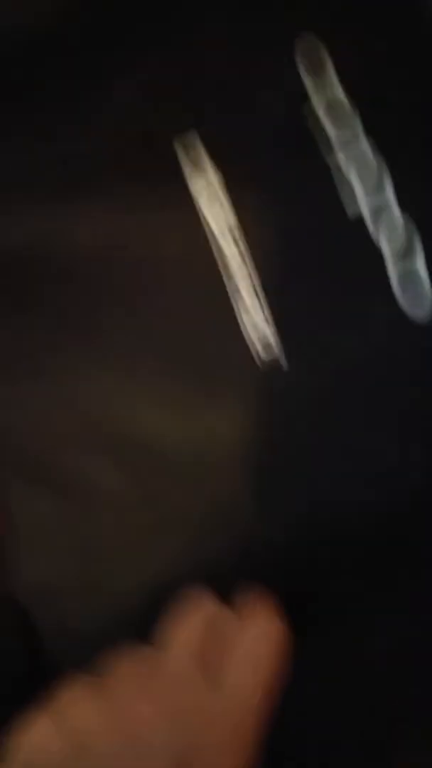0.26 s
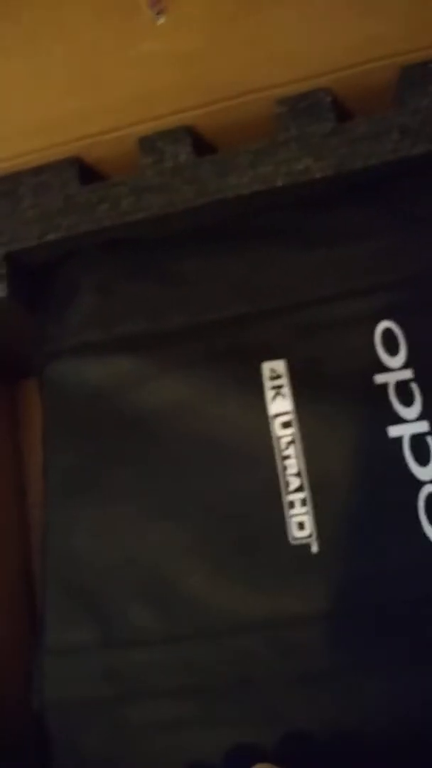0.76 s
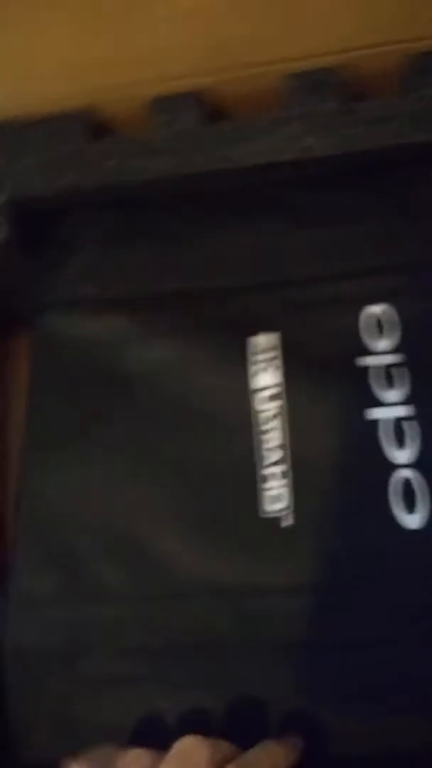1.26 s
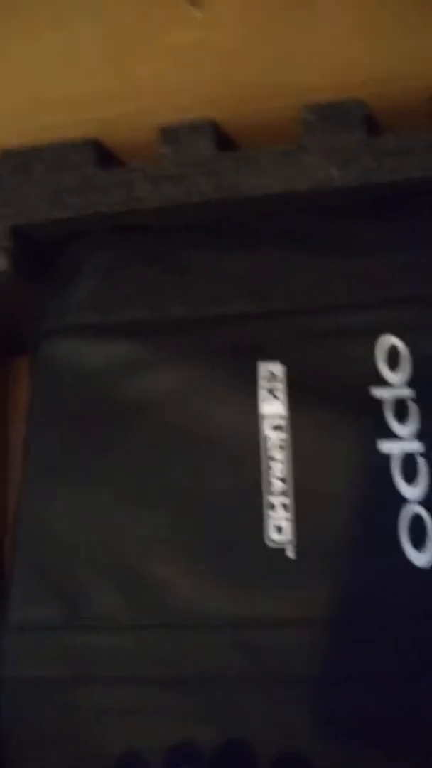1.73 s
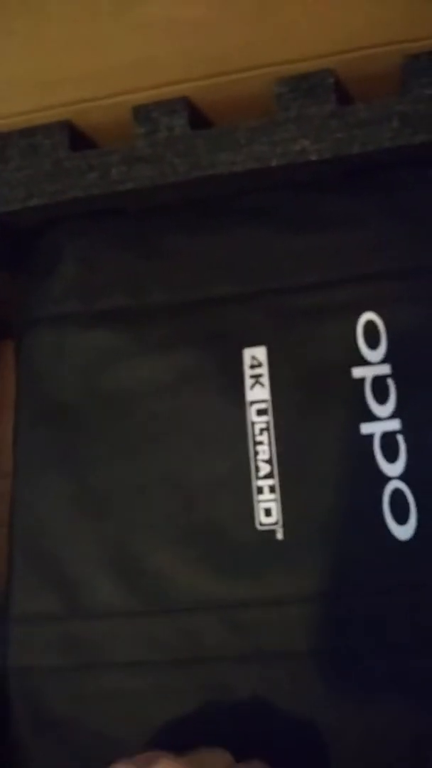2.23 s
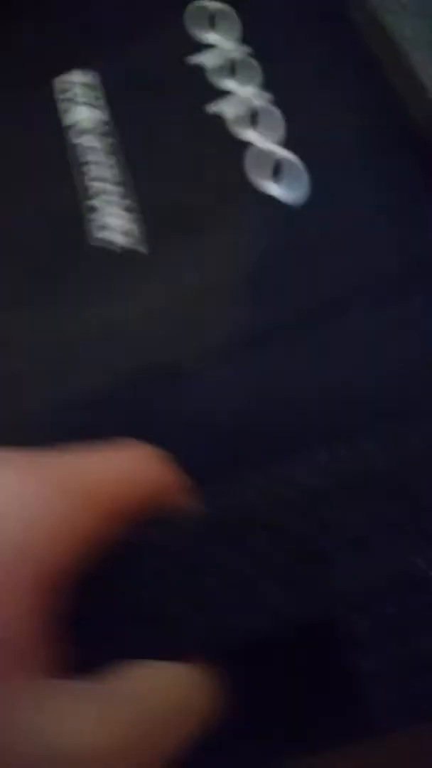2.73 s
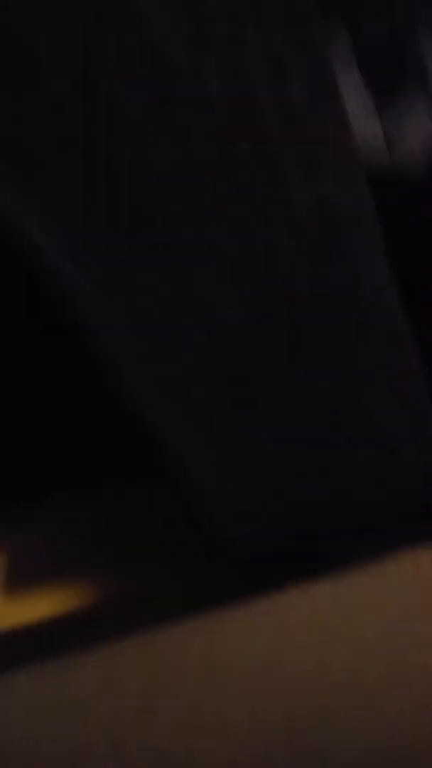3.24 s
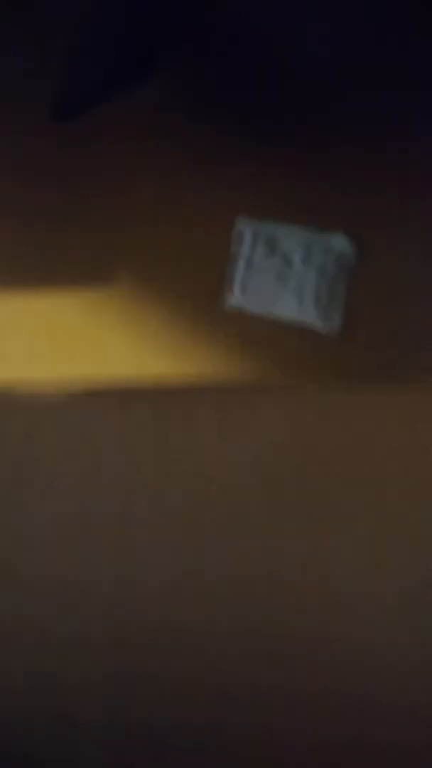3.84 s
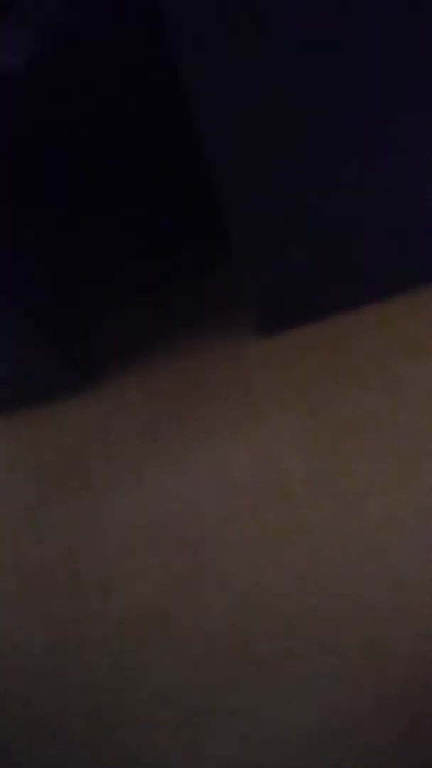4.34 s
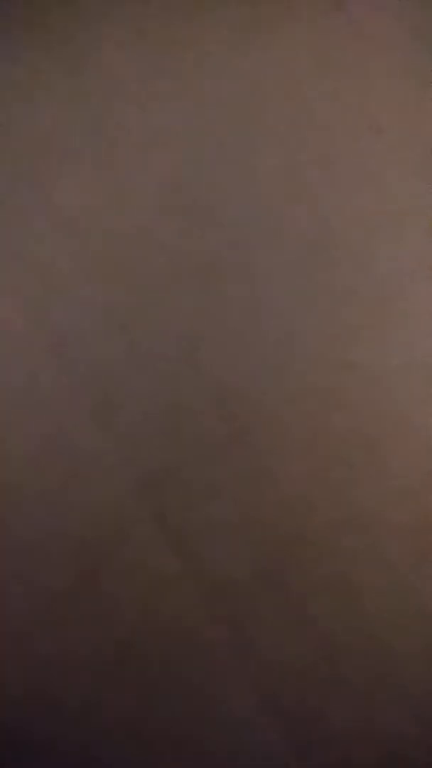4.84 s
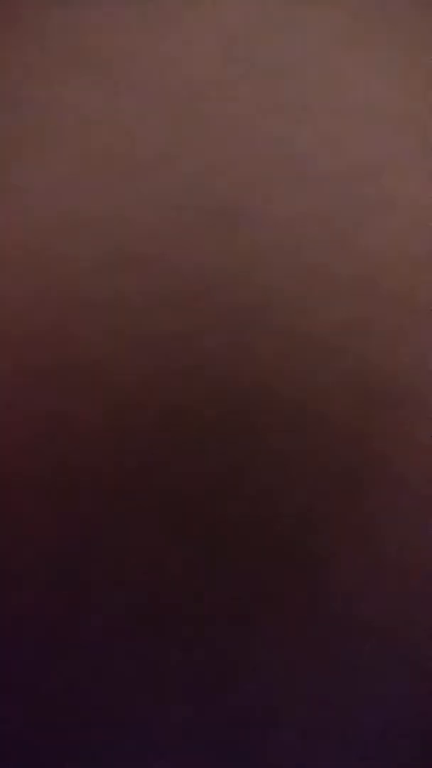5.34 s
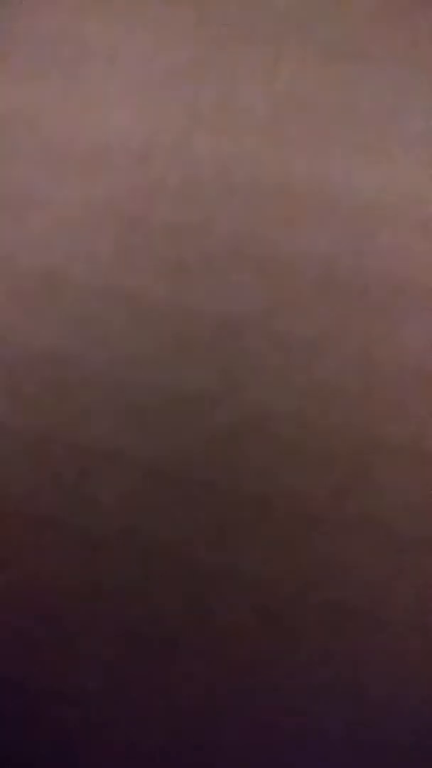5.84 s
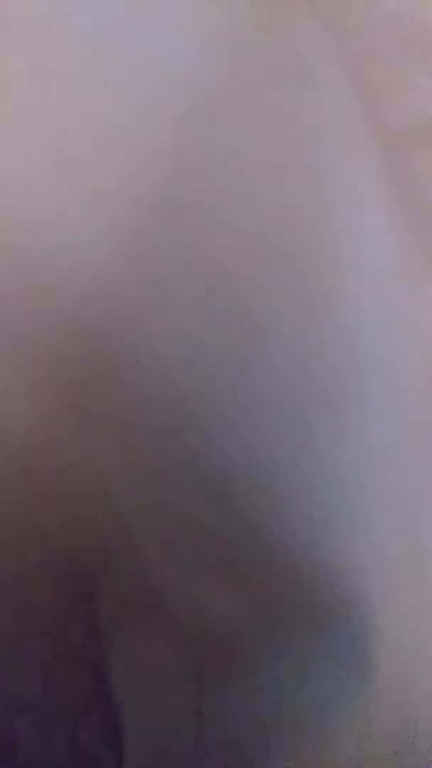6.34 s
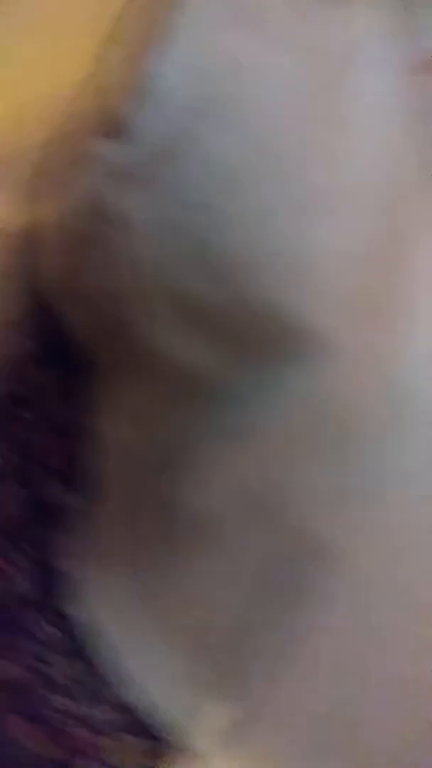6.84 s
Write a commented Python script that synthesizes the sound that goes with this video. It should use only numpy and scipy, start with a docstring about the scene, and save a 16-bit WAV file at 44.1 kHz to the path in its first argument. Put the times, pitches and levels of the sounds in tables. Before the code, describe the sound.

Foam packing rubs lightly against a cardboard box, with a small knock and a few brief scrapes. After a lull, a sharp snap and hollow thumps lead into longer, hissing drags that make the box walls rumble. More thumps follow, and the scraping is loudest near the end before it dies away. The microphone is close, in a quiet room with little echo.

```python
"""Hissing, rubbing and hollow knocks: foam packing is dragged out of a cardboard box.
Tiny foam cells catch on the cardboard and let go, which hisses and makes the walls rumble.
Pieces knock the box, which booms like a slack drum, and foam edges snap free.
A hand-held mono microphone is close by, in a soft room."""
import sys
import numpy as np
from scipy import signal
from scipy.fft import rfft, irfft, next_fast_len
from scipy.io import wavfile
from scipy.ndimage import uniform_filter1d, map_coordinates

SR = 44100
rng = np.random.default_rng(int(sys.argv[2]) if len(sys.argv) > 2 else 0)


def generate_wav(sig):
    """Save sig (samples, or channels by samples) to the path in sys.argv[1] as 16-bit PCM at SR."""
    pcm = np.round(np.clip(np.atleast_2d(sig).T, -1, 1) * 32767).astype(np.int16)
    wavfile.write(sys.argv[1], SR, pcm)


N = 312669

# The notes the box walls ring at. Each row: pitch in Hz, seconds to fade by 60 dB.
WALL_NOTES = [(130, 0.15), (180, 0.14), (215, 0.05), (260, 0.12), (355, 0.049), (410, 0.08), (525, 0.14),
              (700, 0.11), (1010, 0.045), (1440, 0.043), (2130, 0.11)]
EDGE_DB = 20  # a swell gains this much over its rise time and loses it over its fall time
TOP_HZ = 15950


def drag():
    """Foam scrapes on cardboard: one uneven pull shakes the hiss, rub, rumble and fizz together."""
    # The tone of each of the four. Each row: frequency in Hz, relative level in dB.
    hiss_tone = [(1300, -7.5), (2200, -3), (3000, 0.5), (4600, 1.5), (6700, 0.5), (7800, -6), (9500, -6.5),
                 (14000, -52)]
    rub_tone = [(320, -12.5), (550, -8.5), (790, 0), (1180, -1.5), (2100, -3.5), (3000, -11.5), (3900, -26),
                (6600, -120)]
    rumble_tone = [(18, -61), (30, -9), (108, -2.5), (182, 3.5), (339, -3), (543, -2), (750, -9),
                   (980, -23.5), (1650, -120)]
    fizz_tone = [(5500, -30), (7800, -3), (9900, 0), (11300, -5), (12800, -12), (15200, -11), (16000, -16)]
    # Hollows between foam and wall open and close. Each row: time in seconds, low resonance in Hz,
    # its boost in dB, high resonance in Hz, pitch of the pressed wall in Hz, its boost in dB.
    hollows = [(0, 1070, -3, 4340, 230, 6), (.33, 1630, 3.5, 3700, 243, 7.5),
               (.56, 565, -5, 3940, 300, 18.5), (.7, 700, -1, 4000, 263, 12),
               (2.1, 1196, 1.5, 4140, 202, 6.5), (2.53, 1220, 5, 3500, 221, 10),
               (3.15, 1190, 4, 5240, 220, 10.5), (3.33, 750, 9.5, 5400, 298, 3),
               (3.52, 990, 5, 4900, 320, 9.5), (3.77, 1060, 9.5, 6300, 361, 13),
               (4.06, 1590, 0, 3110, 261, 5), (4.9, 1980, 0, 6300, 253, 4), (5.2, 680, 9.5, 6300, 294, 5),
               (5.5, 756, 10.5, 5570, 250, 1.5), (5.58, 950, 10.5, 5400, 248, 4.5),
               (6.0, 1090, 2, 4730, 464, 6), (6.5, 1405, 5.5, 3660, 460, 1), (6.82, 1070, -7, 5630, 220, 6),
               (6.86, 900, 6.5, 6200, 620, 10.5)]
    low_hz, low_db, high_hz, wall_hz, wall_db = curves(hollows)
    hiss_db, rub_db, rumble_db, fizz_db = stroke_levels()
    jerk_db = 0.7 * wobble(35) + 1.3 * wobble(110)
    hiss = friction(hiss_tone, slips_per_s=3000, spread_db=3, smooth=0.63, patchy_db=1.3,
                    peak_hz=high_hz, lift_db=np.full(N, 4.0), octaves=0.49)
    hiss *= amp(hiss_db + jerk_db)
    rub = friction(rub_tone, slips_per_s=900, spread_db=1, smooth=0.86, patchy_db=1.5,
                   peak_hz=low_hz, lift_db=low_db, octaves=0.12)
    rub = amp(rub_db + 0.41 * jerk_db) * box_walls(rub, lift_db=2)
    rumble_db += 0.48 * jerk_db + 0.47 * wobble(25)  # the walls also judder on their own
    rumble = friction(rumble_tone, slips_per_s=400, spread_db=2, smooth=0.88, patchy_db=1.7,
                      peak_hz=wall_hz, lift_db=wall_db, octaves=0.25)
    fizz_db += 0.85 * jerk_db + 1.34 * wobble(27)
    fizz = friction(fizz_tone, slips_per_s=4000, spread_db=3.5, smooth=0.55, patchy_db=1.3)
    return hiss + rub + amp(rumble_db) * rumble + amp(fizz_db) * fizz


def stroke_levels():
    """Levels in dB of hiss, rub, rumble and fizz: each pull rises, holds and falls over light handling."""
    # Each row: time full strength is reached, then rise, hold and fall, all in seconds;
    # then hiss, rub, rumble and fizz in dB.
    strokes = [(0.145, 0.017, 0.034, 0.056, -44.5, -40, -58, -51),
               (0.279, 0.012, 0.14, 0.043, -41, -41, -50, -48.5),
               (0.479, 0.016, 0.014, 0.0091, -36, -32, -44, -44.5),
               (0.54, 0.014, 0.052, 0.11, -64, -47.5, -34, -74),
               (1.226, 0.014, 0.046, 0.06, -48, -47.5, -50, -56),
               (1.363, 0.025, 0.017, 0.16, -50, -42, -42.5, -61),
               (1.976, 0.14, 0.012, 0.41, -46, -52, -53, -53.5),
               (2.09, 0.008, 0.11, 0.12, -33, -31, -40.5, -43),
               (2.34, 0.13, 0.0058, 0.12, -45.5, -42, -44, -53.5),
               (2.498, 0.049, 0.067, 0.075, -36.5, -37.5, -58, -48.5),
               (2.878, 0.029, 0.0075, 0.0086, -27.5, -27.5, -20.5, -35),
               (2.904, 0.022, 0.0081, 0.15, -46, -43.5, -36.5, -50),
               (3.194, 0.2, 0.014, 0.4, -34, -31.5, -41.5, -38.5),
               (3.474, 0.19, 0.12, 0.0067, -33.5, -23, -27.5, -45),
               (3.646, 0.097, 0.051, 0.12, -37.5, -29.5, -25.5, -47),
               (3.872, 0.44, 0.019, 0.033, -41, -38.5, -70, -40.5),
               (4.06, 0.13, 0, 0.048, -31.5, -32, -52, -42.5),
               (4.286, 0.081, 0.0051, 0.035, -48, -41, -35, -50),
               (4.364, 0.017, 0, 0.029, -43, -37.5, -33.5, -50), (4.554, 0.13, 0, 0.44, -59, -71, -69, -47),
               (4.897, 0.047, 0.0097, 0.12, -43, -34.5, -26.5, -53),
               (5.117, 0.074, 0.031, 0.075, -46, -71, -39, -44),
               (5.226, 0.14, 0.098, 0.39, -41.5, -35.5, -33.5, -49),
               (5.733, 0.88, 0.21, 0.13, -47, -39.5, -45.5, -54),
               (6.022, 0.089, 0.054, 0.039, -42, -36.5, -31, -54.5),
               (6.169, 0.014, 0.21, 0.36, -37, -34, -35.5, -45), (6.51, 0.1, 0, 0.096, -20, -20, -31, -35),
               (6.613, 0.037, 0.03, 0.018, -23.5, -21, -30, -44),
               (6.67, 0.21, 0.15, 0.13, -45, -36, -53, -57),
               (6.789, 0.051, 0.039, 0.071, -30, -37, -33.5, -34),
               (6.84, 0.006, 0.043, 0.11, -39.5, -34.5, -23.5, -65),
               (7.019, 0.087, 0, 0.1, -48.5, -44, -58, -68)]
    # Light handling between pulls. Each row: time in seconds, hiss in dB, rub in dB.
    handling = [(0, -54, -49), (.62, -49.5, -49.5), (.77, -51.5, -51), (.82, -60, -60),
                (1.04, -67.5, -64.5), (1.065, -84, -82), (1.16, -68, -66), (1.3, -51.5, -50.5),
                (1.53, -51, -54.5), (1.59, -63, -62), (2., -70.5, -57.5), (2.82, -53, -52),
                (3.1, -45.5, -56.5), (4.05, -44, -35.5), (4.13, -54.5, -51.5), (4.57, -51, -51),
                (4.84, -46, -40.5), (5.06, -50.5, -63), (5.95, -46.5, -43), (6.15, -48, -45),
                (6.72, -40.5, -43.5), (7.09, -62, -58)]
    full_at, rise, hold, fall, *bands_db = np.transpose(strokes)[:, :, None]
    t = np.arange(0, N / SR, .001)
    before = np.maximum(full_at - t, 0) / rise
    after = np.maximum(t - full_at - hold, 0) / fall
    shape_db = -EDGE_DB * (before + after)
    powers = [np.sum(amp(db + shape_db) ** 2, axis=0) for db in bands_db]
    stroke_power = np.array([np.interp(np.arange(N) / SR, t, power) for power in powers])
    hiss_db, rub_db = curves(handling)
    light_power = amp([hiss_db, rub_db, rub_db - 1, hiss_db - 8]) ** 2
    return 10 * np.log10(stroke_power + light_power)


def friction(tone, slips_per_s, spread_db, smooth, patchy_db, peak_hz=None, lift_db=0, octaves=1):
    """Foam cells slip at random, a few of them hard; smooth is the share of power that is even rubbing."""
    slipping = rng.random(N) < slips_per_s / SR
    sizes = amp(spread_db * np.minimum(rng.exponential(size=N), 3.5))
    slips = slipping * sizes * rng.standard_normal(N)
    rub = np.sqrt(smooth) * rng.standard_normal(N) + np.sqrt(1 - smooth) * unit(slips)
    hz, t, spectrum = signal.stft(rub, SR, nperseg=1024)
    patches = uniform_filter1d(rng.standard_normal(spectrum.shape), size=10, axis=0)
    patches = uniform_filter1d(patches, size=7, axis=1)
    colour = amp(patchy_db * unit(patches))  # resonances drift in patches
    if peak_hz is not None:
        frames = np.minimum((t * SR).astype(int), N - 1)
        distance = np.log2((hz[:, None] + 1) / peak_hz[frames]) / octaves
        colour *= amp(lift_db[frames] * np.exp(-distance ** 2))
    rub = signal.istft(spectrum * colour, SR, nperseg=1024)[1][:N]
    return unit(filtered(rub, lambda hz: amp(along(tone, hz))))


def box_walls(x, lift_db):
    """Rubbing makes the walls ring, so their notes stand out as narrow bands."""
    note_hz, fade_s = np.transpose(WALL_NOTES)[:, :, None]
    half_width = np.log(1000) / (2 * np.pi * fade_s)

    def response(hz):
        peaks = 1 / (1 + ((hz - note_hz) / half_width) ** 2)
        return amp(lift_db * peaks.sum(axis=0))
    return unit(filtered(x, response))


def knocks():
    """A blow dents the wall for a few cycles, rings the wall notes near its pitch and booms the box."""
    # Each row: start in seconds, dent level in dB, dent pitch in Hz, boom level in dB, boom pitch in Hz,
    # then wall ring and hardness (the crack), both in dB relative to the dent.
    blows = [(0.038, -24.5, 255, -34, 129, -22, -15), (2.089, -21.5, 188, -46, 137, -2, -8),
             (2.099, -18.5, 175, -49, 133.4, -5.5, -8), (2.805, -36, 304, -60, 100, -4, -8),
             (2.84, -20, 253, -11, 100, -25, -12), (2.874, -17.5, 240, -50, 92, 6.5, -3),
             (2.999, -31, 450, -61, 99, -7, -16), (3.1056, -4, 200, -18, 104, -32, -25),
             (3.399, -24, 302, -32, 101, -2, 2), (3.489, -16.5, 206, -28, 95, 0, -9),
             (3.578, -2.5, 274, -22, 94.4, -6.5, -5.5), (3.936, -24.5, 178.8, -30.5, 93.5, -4, -3.5),
             (4.139, -34, 197, -34, 117, 5, -17), (4.275, -31.5, 233, -40.5, 110, -7, -5),
             (4.362, -26, 490, -64, 97, -7, -7), (4.626, -33.5, 104, -49, 95, -18, -26),
             (4.9169, -5, 256, -11.5, 126, -29, -43), (4.9243, -5, 248, -21, 135, -16, -41),
             (4.939, -10, 230, -40, 130, -18, -43), (5.7955, -1, 333, -18, 109, -18, -15),
             (6.004, -25.5, 241, -32, 86.4, 0.5, 1), (6.13, -14.5, 283, -27.5, 110, -30, -19),
             (6.335, -10, 267, -27, 124, -27, -8), (6.584, -16.5, 220, -41, 92.6, -3.5, -5),
             (6.837, -1.5, 306, -20.5, 79.5, -4.5, -8.5)]
    out, t = np.zeros(N + SR), np.arange(SR // 2) / SR
    note_hz, fade_s = np.transpose(WALL_NOTES)[:, :, None]
    sign = (-1) ** np.arange(len(WALL_NOTES))[:, None]  # neighbouring notes push the air opposite ways
    onset = 1 - np.exp(-t / 0.00064)
    for start, db, pitch_hz, boom_db, boom_hz, ring_db, hard_db in blows:
        firm = amp(0.36 * hard_db)  # a soft piece lands slowly
        cycles = pitch_hz * (t + 0.0012 * firm * onset)  # the taut dent starts high and sags
        contact = 1 - np.exp(-cycles * 8 * firm)
        dent = fade(cycles, 3.1) * np.sin(2 * np.pi * cycles) * contact
        crack_cycles = 500 * t + 3.49 * (1 - np.exp(-t / 0.0032))  # hard edges chirp down
        crack = fade(t, 0.042) * np.sin(2 * np.pi * crack_cycles)
        scatter, detune = rng.standard_normal((len(WALL_NOTES), 2)).T[:, :, None]  # no two blows alike
        note_db = -7 * np.log2(note_hz / pitch_hz) ** 2 + 4 * scatter
        notes = np.sin(2 * np.pi * note_hz * (1 + 0.05 * detune) * t)
        ring = np.sum(sign * amp(note_db) * fade(t, fade_s) * notes, axis=0) * contact
        boom_s = 0.36 / max(boom_hz / 100, 1) ** 4.4  # booms above 100 Hz die faster
        boom = amp(boom_db) * fade(t, boom_s) * np.sin(2 * np.pi * boom_hz * t) * onset
        blow = dent / np.abs(dent).max() + amp(ring_db) * ring / np.abs(ring).max() + amp(hard_db) * crack
        out[round(start * SR):][:len(t)] += amp(db) * blow + boom
    return out[:N]


def snaps():
    """A foam edge snaps free with a short burst of cracking cells."""
    # Each row: start in seconds, level in dB before fading in and out, centre frequency in Hz.
    edges = [(.0355, -30, 6900), (.117, -31, 5500), (0.1431, -22.5, 3730), (.394, -17, 6500),
             (.712, -28, 9000), (1.221, -30, 4500), (2.084, -14, 6000), (2.098, -4, 4520),
             (2.716, -31, 4500), (2.839, -20, 5610), (2.8734, 3, 4500), (2.9067, -17, 5500),
             (2.9368, -12.5, 6550), (3.045, -29, 5000), (3.1152, -13, 4600), (4.2338, -25, 5000),
             (4.257, -33, 5980), (4.287, -18, 4170), (4.694, -24, 6750), (4.902, -10.5, 5960),
             (5.718, -15.5, 9000), (5.7665, -15.5, 9000), (5.7947, -13, 2650), (6.0357, -13.5, 2550),
             (6.162, -19.5, 5570)]
    out, t = np.zeros(N + SR), np.arange(2048) / SR
    hz = np.fft.rfftfreq(len(t), 1 / SR) + 1
    shape = fade(t, 0.0093) * (1 - np.exp(-t / 0.0019))
    for start, db, centre_hz in edges:
        band = amp(-7 * np.log2(hz / centre_hz) ** 2)
        burst = unit(irfft(rfft(rng.standard_normal(len(t))) * band))
        out[round(start * SR):][:len(t)] += amp(db) * burst * shape
    return out[:N]


def whistles():
    """Foam sings over a hollow: a narrow hiss swells, may glide, and fades."""
    # Each row: middle in seconds, top level in dB, half length in seconds, pitch in Hz,
    # glide in Hz per second, half width in Hz.
    swells = [(.487, -35, 0.015, 3680, 0, 250), (0.57, -38, 0.036, 640, 0, 120),
              (3.273, -36.5, 0.2, 5050, 802, 800), (3.864, -40, 0.081, 5500, 8000, 800),
              (5.34, -45.5, .19, 5760, -6, 220), (5.63, -42, 0.14, 1430, -200, 60),
              (5.85, -44.5, 0.24, 2120, 1197, 110), (6.193, -38, 0.036, 6000, 0, 350),
              (6.253, -30.5, 0.015, 4960, 20000, 700), (6.307, -33.5, 0.033, 2840, 0, 300)]
    hz, t, spectrum = signal.stft(rng.standard_normal(N), SR, nperseg=512)
    middle, db, half_length, pitch, glide, width = np.transpose(swells)[:, :, None, None]
    distance = (hz[:, None] - pitch - glide * (t - middle)) / width
    band = np.exp(-distance ** 2) * np.sqrt(SR / width / np.sqrt(2 * np.pi))  # same power at any width
    swell = amp(db - EDGE_DB * ((t - middle) / half_length) ** 2)
    return signal.istft(spectrum * np.sum(swell * band, axis=0), SR, nperseg=512)[1][:N]


def top_hiss(stops_at_s=3.915, rise_s=.9, fall_s=.015, above_hz=12000):
    """A faint hiss above 12 kHz swells, then stops abruptly."""
    t = np.arange(N) / SR - stops_at_s
    level_db = -45 - EDGE_DB * (np.maximum(-t, 0) / rise_s + np.maximum(t, 0) / fall_s)
    hiss = filtered(rng.standard_normal(N), lambda hz: (hz < TOP_HZ) / (1 + (above_hz / (hz + 1)) ** 8))
    return amp(level_db + 1.4 * wobble(60)) * unit(hiss)


def room_echo(x):
    """The soft room gives a short echo whose high notes die first."""
    # Each row: frequency in Hz, seconds to fade by 60 dB.
    fade_times = [(150, 0.32), (1000, 0.12), (8000, 0.061)]
    hz, t, spectrum = signal.stft(rng.standard_normal(SR // 2), SR, nperseg=256)
    tail = signal.istft(spectrum * fade(t, along(fade_times, hz)[:, None]), SR, nperseg=256)[1]
    return signal.fftconvolve(np.pad(x, (200, 0)), tail / np.linalg.norm(tail))[:N]


def quiet_room():
    """The room at rest makes a steady, low noise."""
    # Each row: frequency in Hz, relative level in dB.
    room_tone = [(18, -40), (30, 9), (215, -5), (616, -6), (962, -33), (1390, -20), (7470, -37),
                 (16000, -50)]
    return unit(filtered(rng.standard_normal(N), lambda hz: amp(along(room_tone, hz))))


def amp(db):
    """Turn decibels into a gain."""
    return 10 ** (np.asarray(db) / 20)


def fade(t, length):
    """A gain that has dropped 60 dB when t reaches length."""
    return amp(-60 * t / length)


def unit(x):
    """Scale x to an average power of 1."""
    return x / np.sqrt(np.mean(x ** 2) + 1e-20)


def along(points, hz):
    """Read between (Hz, value) points on a log frequency scale."""
    point_hz, values = np.transpose(points)
    return np.interp(np.log(hz + 1), np.log(point_hz + 1), values)


def curves(rows):
    """One value per sample for each column after the time."""
    times, *columns = np.transpose(rows)
    return [np.interp(np.arange(N) / SR, times, column) for column in columns]


def wobble(rate):
    """A smooth curve through rate random points a second."""
    return map_coordinates(rng.standard_normal(int(N * rate / SR) + 4), [np.arange(N) * rate / SR])


def filtered(x, response):
    """Scale each frequency of x by response(hz)."""
    size = next_fast_len(N + SR // 2)
    return irfft(rfft(x, size) * response(np.fft.rfftfreq(size, 1 / SR)), size)[..., :N]


def scene():
    """Everything reaches one microphone; only the knocks and snaps get an echo."""
    hits = knocks() + snaps()
    background = amp(-69.5) * quiet_room()
    mono = hits + amp(-17) * room_echo(hits) + drag() + whistles() + top_hiss() + background
    return np.tile(mono, (2, 1))


def record(dry):
    """The deepest bass is dropped, loud blows are squeezed and the treble ends at TOP_HZ."""
    bass_cut = signal.sosfilt(signal.butter(3, 52, "highpass", fs=SR, output="sos"), dry)
    squeezed = bass_cut / (1 + np.abs(bass_cut / .9) ** 6) ** (1 / 6)
    return filtered(squeezed, lambda hz: hz < TOP_HZ)


dry = scene()
out = record(dry)
generate_wav(out)
```